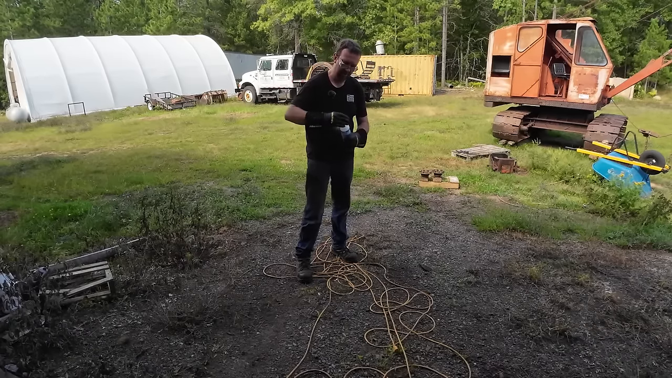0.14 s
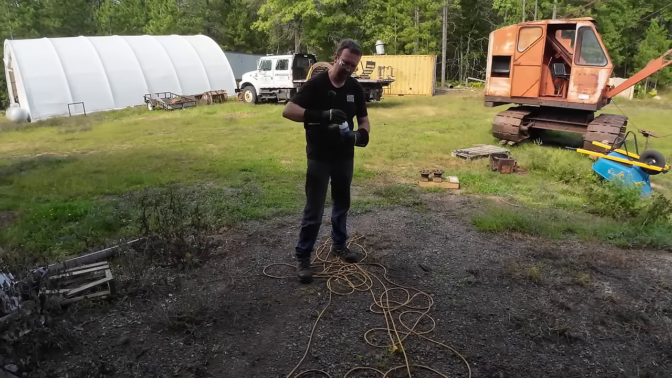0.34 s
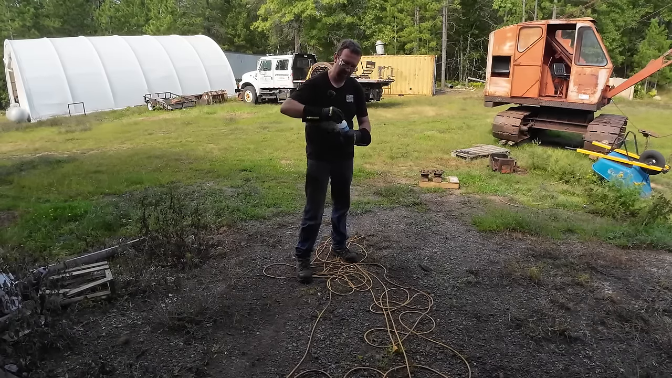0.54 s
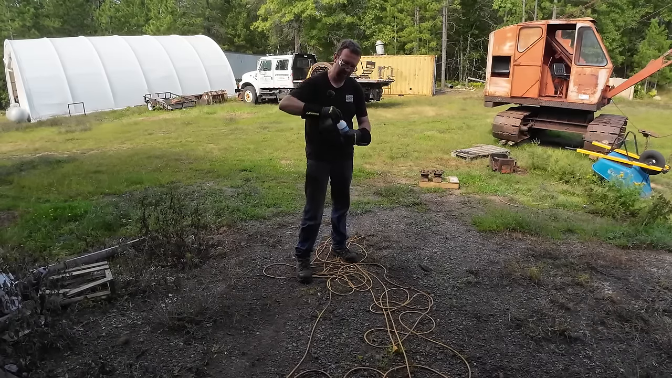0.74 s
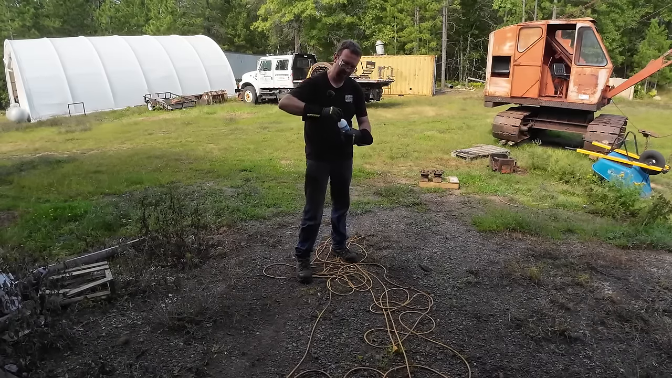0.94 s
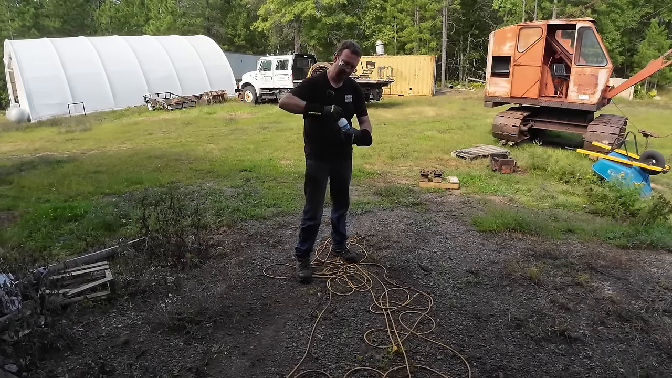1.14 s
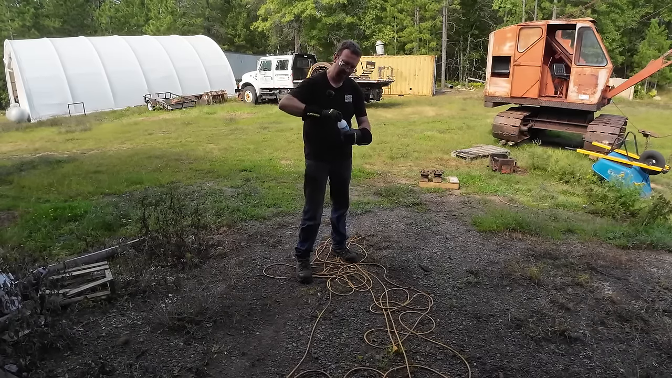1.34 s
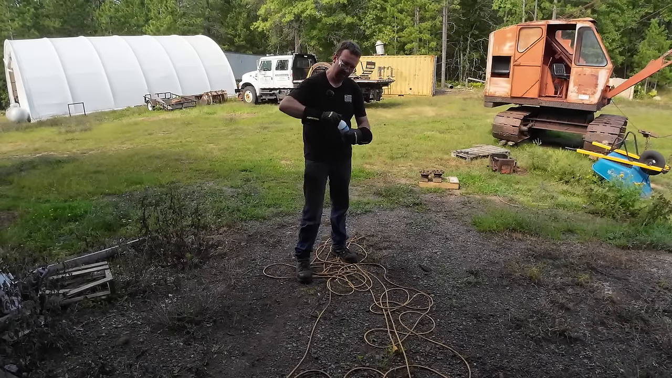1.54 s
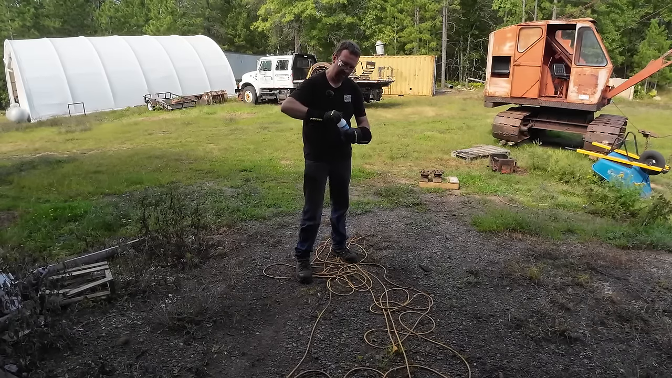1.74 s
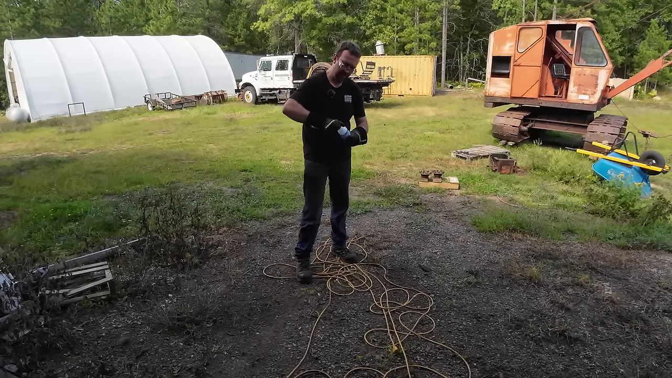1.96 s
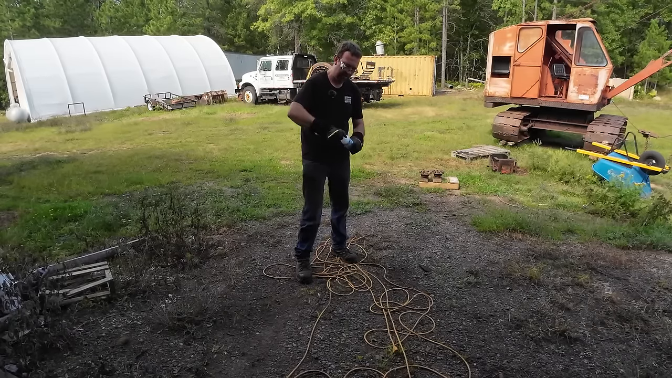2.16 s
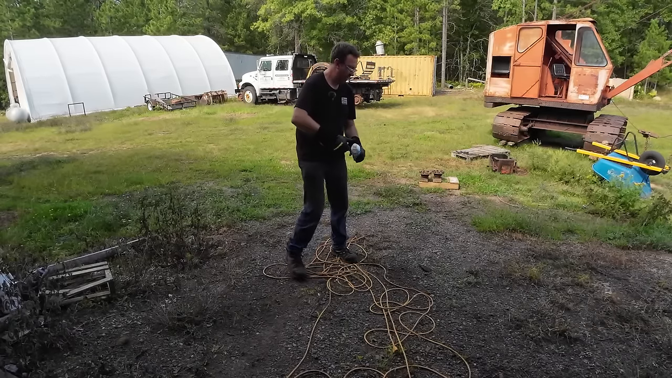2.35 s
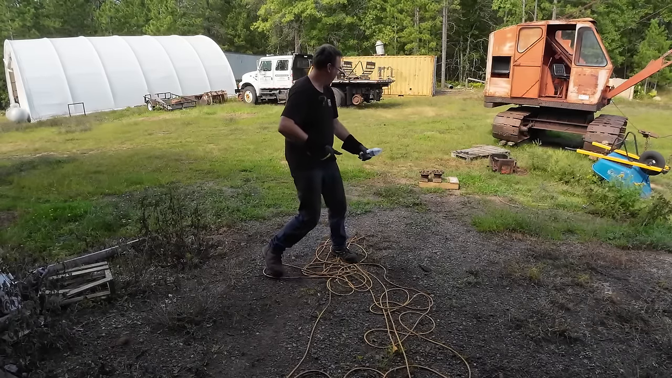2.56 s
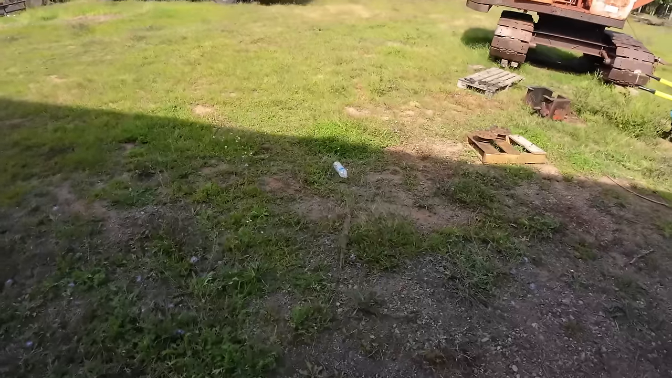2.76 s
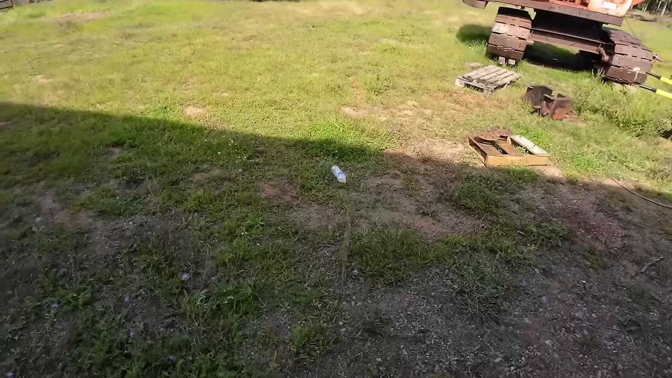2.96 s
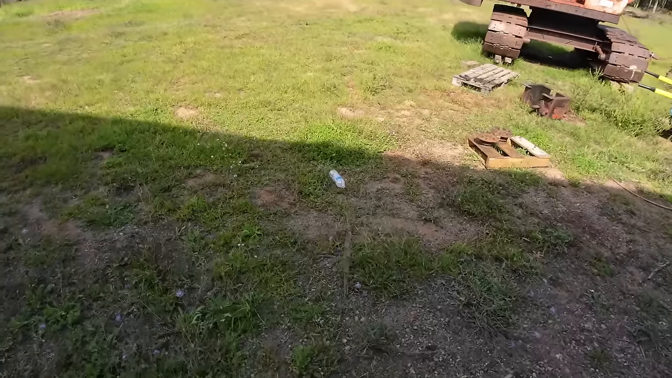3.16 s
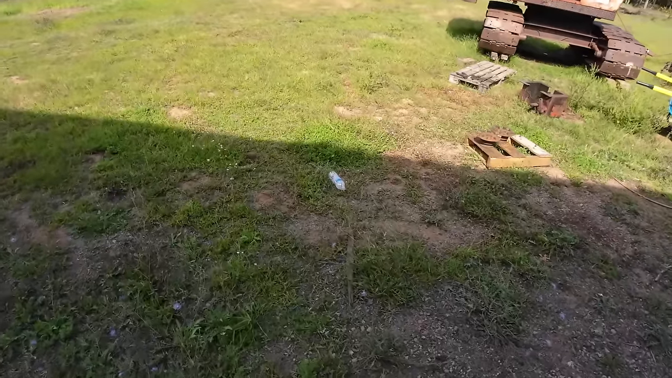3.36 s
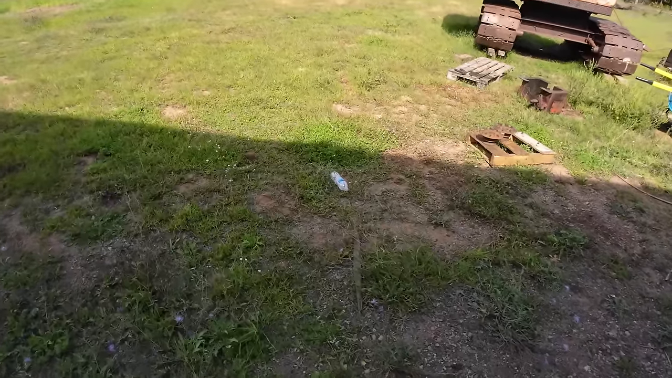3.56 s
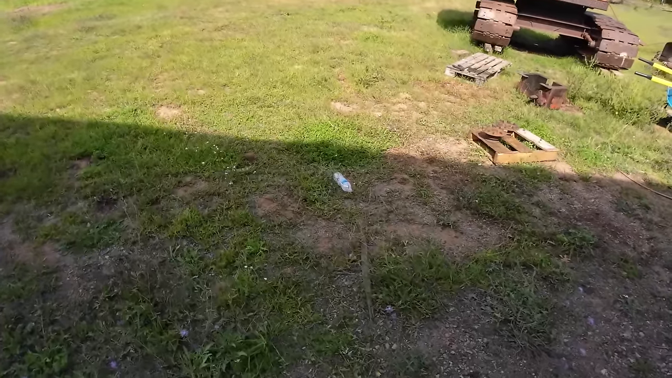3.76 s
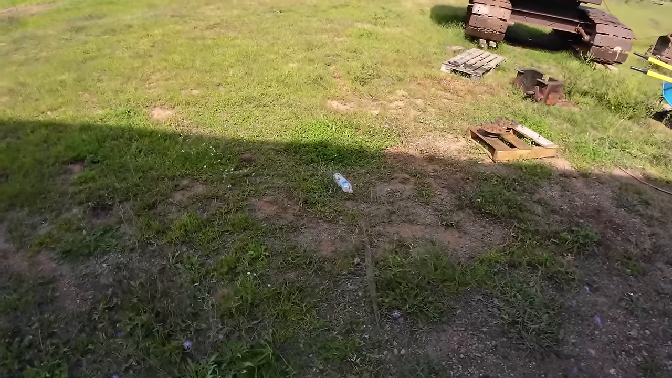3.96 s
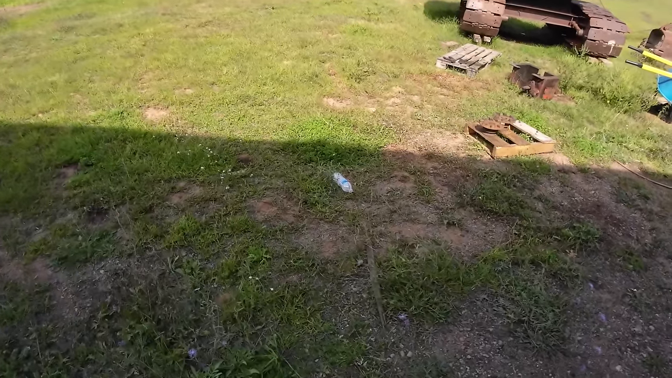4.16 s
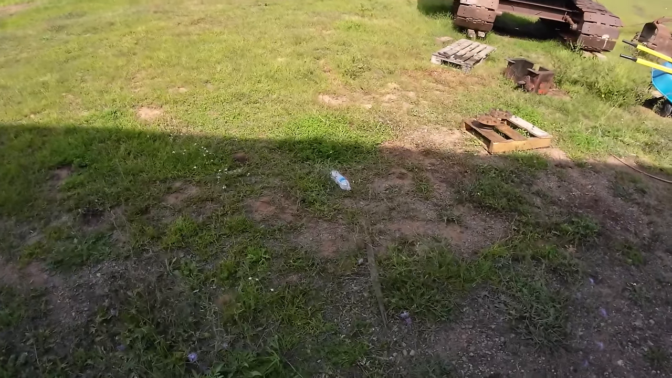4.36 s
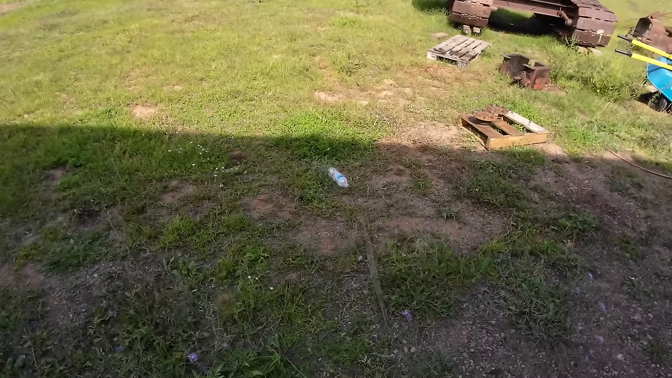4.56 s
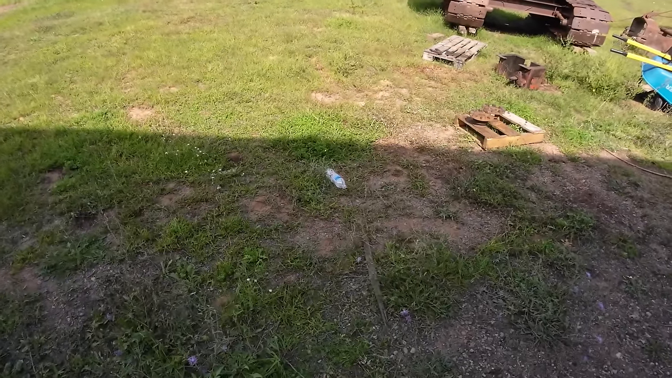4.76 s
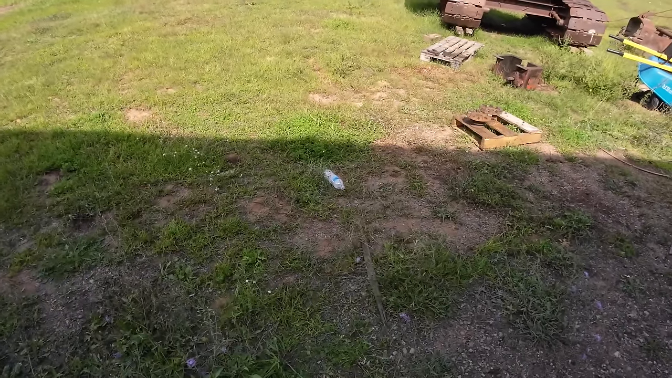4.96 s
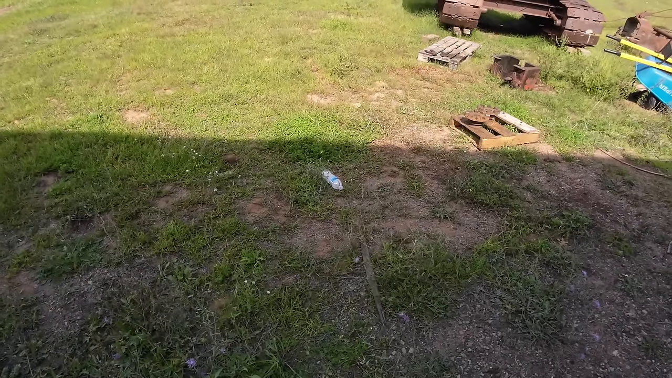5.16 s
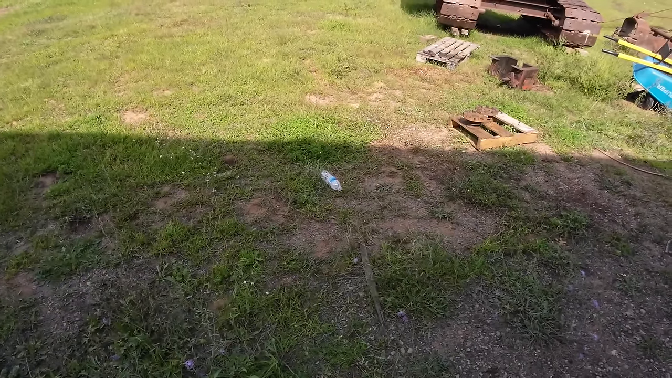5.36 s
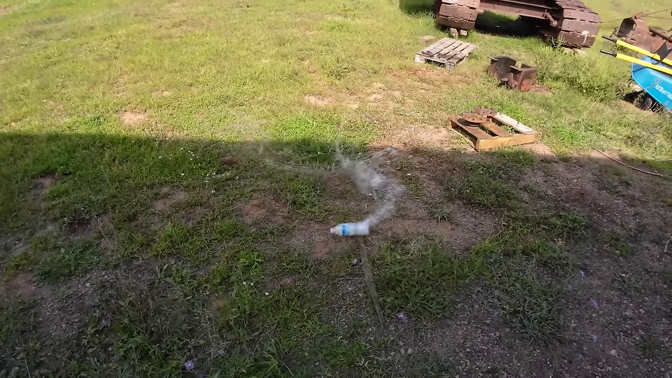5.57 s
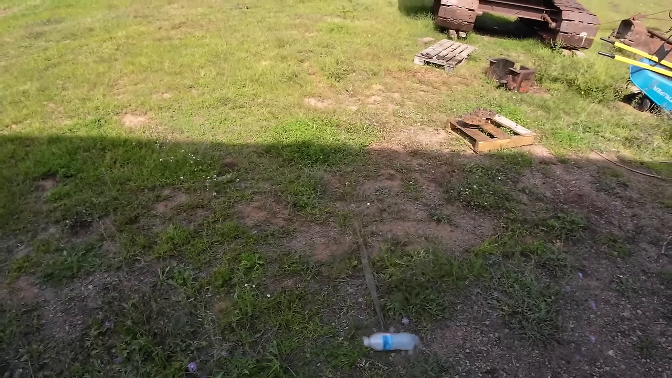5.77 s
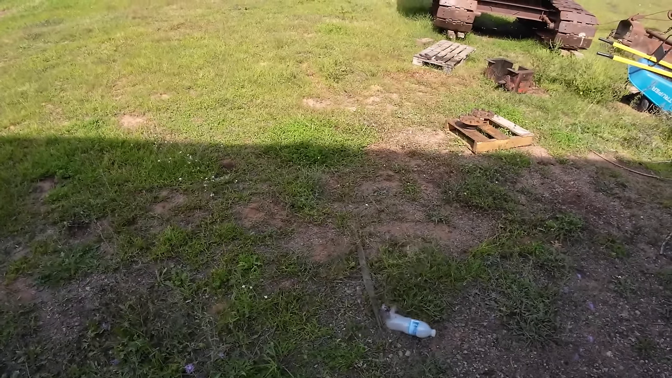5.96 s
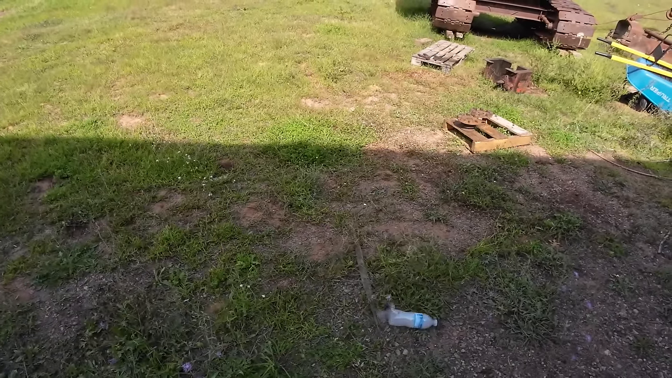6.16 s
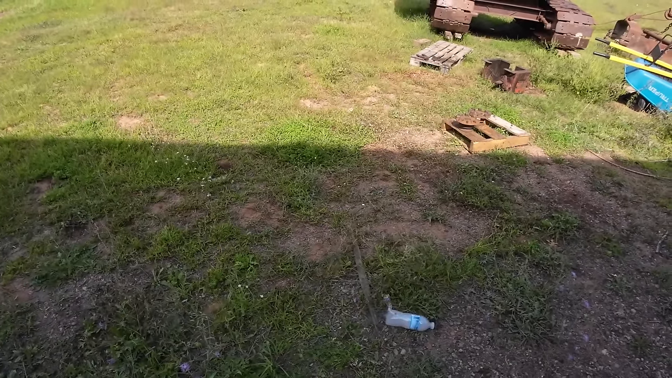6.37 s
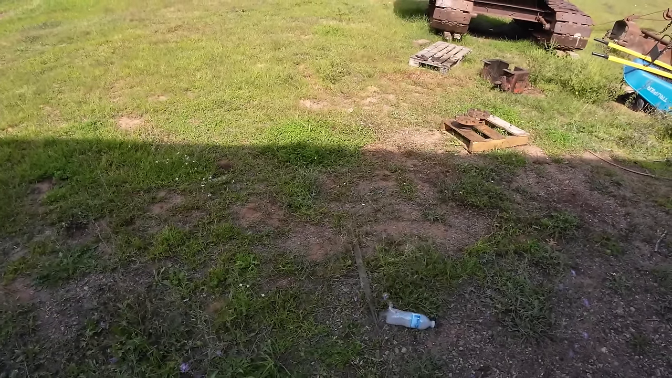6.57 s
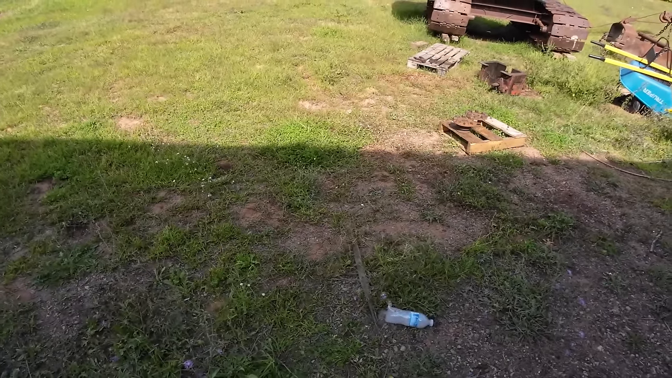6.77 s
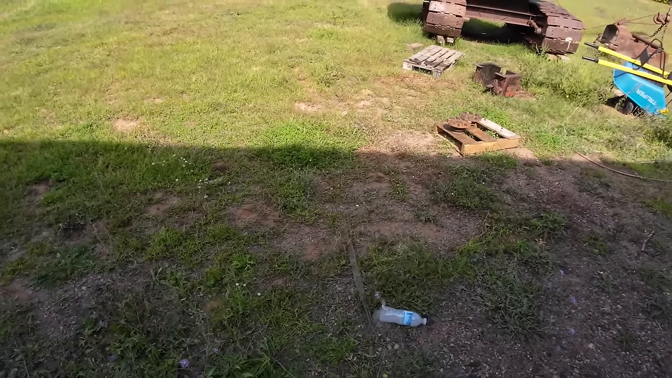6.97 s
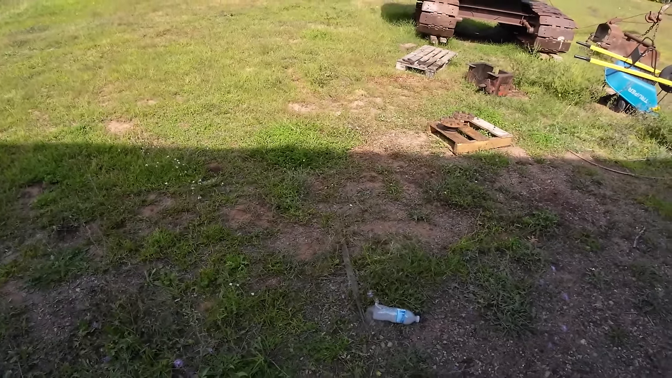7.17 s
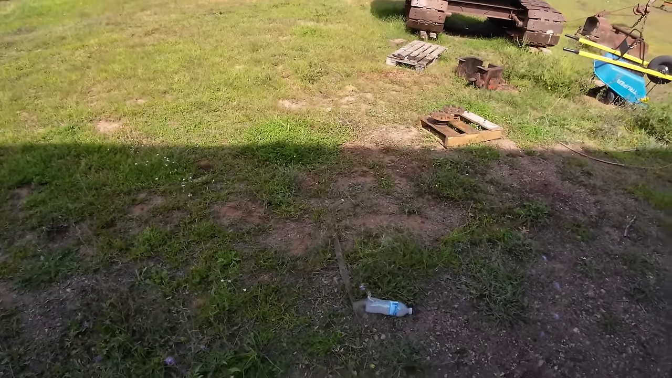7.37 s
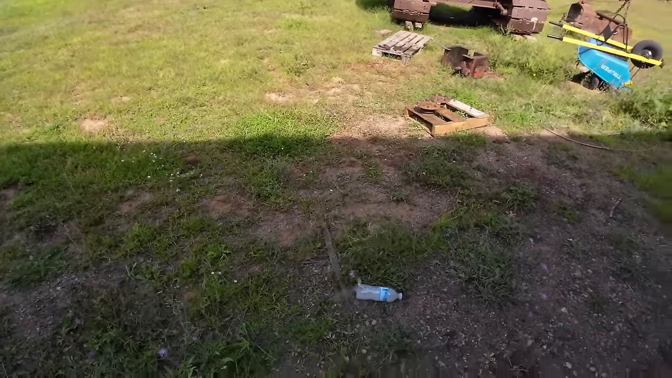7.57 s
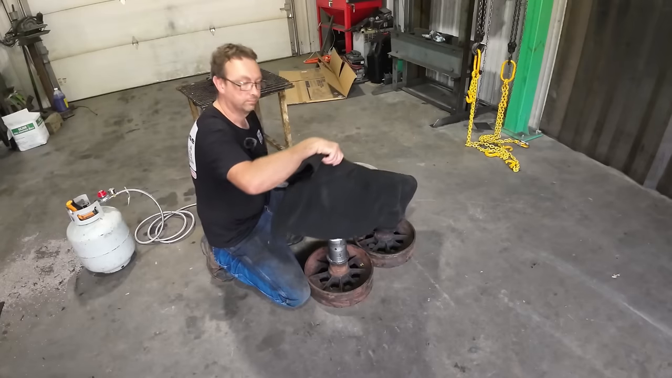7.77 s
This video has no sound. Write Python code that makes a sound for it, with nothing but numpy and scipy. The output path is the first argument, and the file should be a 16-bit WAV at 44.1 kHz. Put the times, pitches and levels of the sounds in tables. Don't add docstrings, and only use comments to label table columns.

```python
import sys
import numpy as np
from scipy import signal
from scipy.io import wavfile
from scipy.ndimage import uniform_filter1d

SR = 44100
rng = np.random.default_rng(int(sys.argv[2]) if len(sys.argv) > 2 else 0)


def boost_factor(decibels):
    exponent = np.asarray(decibels, float) / 20
    return 10 ** exponent


def store_wav(level_fs):
    pcm = np.round(np.clip(np.atleast_2d(level_fs), -1, 1) * 32767)
    wavfile.write(sys.argv[1], SR, pcm.T.astype(np.int16))


N = 344446
T = np.arange(N) / SR
INDOOR_S = 7.63


def band(x, hz, width, order=1):
    edges = np.clip([hz * hz / (hz + width / 2), hz + width / 2], 10, .48 * SR)
    return signal.sosfilt(signal.butter(order, edges, "bandpass", fs=SR, output="sos"), x)


def unit(x):
    return x / np.sqrt(np.mean(x ** 2))


def walk(rate):
    k = int(SR / rate)
    steps = np.repeat(rng.standard_normal(N // k + 1), k)
    return 1.194 * uniform_filter1d(uniform_filter1d(steps, k), k)[:N]


def coloured(points, flicker_db, grain_db):
    hz, db = np.transpose(points)
    out = 0
    for f in hz[0] * 2 ** np.arange(.25, np.log2(hz[-1] / hz[0]), .5):
        grains = rng.standard_normal(N) * boost_factor(grain_db * rng.exponential(size=N))
        weight_db = np.interp(np.log(f), np.log(hz), db) + 10 * np.log10(f)
        out = out + boost_factor(weight_db + flicker_db * walk(12)) * unit(band(grains, f, f / 3, order=2))
    return unit(out)


def bump(s, spread):
    return np.exp(-((T - s) / spread) ** 2)


def add(out, s, x):
    i = int(s * SR)
    out[i:i + len(x)] += x[:len(out) - i]


# start_s, level_db
GUST = [(0, -61.5), (.2, -67), (1.1, -67.5), (2.09, -67), (2.55, -66), (2.65, -58.5), (3.2, -62),
        (3.46, -58), (3.75, -63), (4.4, -58.5), (5.0, -62), (5.5, -63), (6.25, -64), (6.5, -56),
        (6.65, -61.5), (7.2, -56), (7.6, -59), (7.81, -57)]


def breeze_db():
    return np.interp(T, *np.transpose(GUST))


# pitch_hz, level_db (per Hz)
WIND = [(12, -30), (20, -5), (75, 3.5), (130, -2.5), (221, -9), (253, -5.5), (300, -10), (390, -40.5),
        (660, -120)]


def wind():
    return boost_factor(breeze_db()) * coloured(WIND, 2.0, 0.1)


def stirred(calm_level_db, share):
    calm_breeze_db = -63
    return boost_factor(calm_level_db + share * (breeze_db() - calm_breeze_db))


# peak_s, level_db, spread_s
BRUSH = [
    (.97, -60.5, 0.046),
    (1.15, -60, .12),
    (1.5, -53.5, 0.17),
    (2.35, -62, 0.185),
    (3.3, -63.5, 0.12),
    (4.45, -62.5, 0.32),
    (7.4, -63.5, 0.27),
]


def brush_power():
    return sum(boost_factor(db) ** 2 * bump(s, spread) for s, db, spread in BRUSH)


def duck():
    until_s, release_s = 6.47, 0.16
    return boost_factor(-5 * (T > BURST[0][0]) * np.exp(-np.maximum(T - until_s, 0) / release_s))


# pitch_hz, level_db (per Hz)
CLOTH = [(110, -34), (180, -6.5), (259, 1), (456, 4), (642, -2), (784, 1.5), (1630, -7.5), (3000, -20),
         (3900, -49.5), (6600, -120)]


def grass_and_cloth():
    level = np.sqrt(stirred(-63, .4) ** 2 + brush_power())
    return duck() * level * coloured(CLOTH, 1.6, 3.0)


# peak_s, level_db, rise_s, fall_s
GAS = [
    (1.2, -64.5, .25, 0.088),
    (1.508, -54, 0.052, 0.098),
    (2.07, -59, .02, 0.1),
    (2.24, -53, 0.086, .08),
    (2.36, -57, .05, .05),
]


def pressure():
    gas_end_s = 2.6
    flow = sum(boost_factor(db) * np.exp(-np.abs(T - s) / np.where(T < s, rise, fall)) for s, db, rise, fall in GAS)
    return flow * (T < gas_end_s)


# pitch_hz, level_db (per Hz)
LEAVES = [(1290, -35.5), (2200, -4), (3110, -3.5), (4660, -8), (7530, -10), (9700, -15.5), (12500, -14.5),
          (15600, -21), (16500, -34)]


def leaves():
    brushing = boost_factor(-4.5) ** 2 * brush_power()
    spray = (boost_factor(-6) * pressure()) ** 2
    level = np.sqrt(stirred(-66, 0.37) ** 2 + brushing + spray)
    indoors = boost_factor(-5 * (T > INDOOR_S))
    return duck() * level * indoors * coloured(LEAVES, .8, 1.6)


def strike(t, rise, fall, carrier, ring=0.):
    x = carrier * np.where(t < 0, np.exp(-(t / rise) ** 2), np.exp(-t / fall) + ring * np.exp(-t / .005))
    return x / np.abs(x).max()


# thud_db, crack_db, crack_share (of the brittleness, no unit)
KINDS = [
    (-2.5, -5.5, 0.66),
    (-12.5, 13, 1),
    (1, -3.5, 0.97),
]
SNAP, CLICK, KNOCK = 0, 1, 2


def hit(out, s, hz, db, brittle_db, kind, extra_thud_db=0):
    thud_db, crack_db, share = KINDS[kind]
    thud_db += db + extra_thud_db - 8.5 * np.log2(hz / 510)
    crack_db += db + share * brittle_db
    t = (np.arange(1024) - 256) / SR
    a, b, c = rng.standard_normal((3, 1024))
    thud = strike(t, 0.00066, 0.00094, np.sin(2 * np.pi * 330 * t))
    swing = -np.cos(2 * np.pi * hz * t) + 0.66 * unit(band(a, 1100, 1800, order=2))
    body = strike(t, .8 / hz, .0009, swing, ring=0.1)
    snap = np.cos(2 * np.pi * 3600 * t) + 1.1 * unit(band(b, 3300, 2800, order=2))
    crack = strike(t, 0.0005, 0.00092, snap, ring=.04)
    shards = band(c, 7500, 4400, order=2) + 0.36 * band(c, 15000, 5000, order=2)
    splinter = strike(t, 0.00014, 0.001, shards)
    mix = boost_factor(thud_db - 2.0) * thud + boost_factor(db) * body + boost_factor(crack_db) * crack
    add(out, s + t[0], mix + boost_factor(db + brittle_db) * splinter)


# peak_s, pitch_hz, level_db, brittleness_db
KNOCKS = [(0.1127, 510, -47.5, 1), (0.2085, 525, -36, -2.5), (0.2988, 860, -43, -11),
          (0.3142, 510, -42.5, -22), (0.4168, 600, -47.5, -12), (0.4838, 505, -33, -13),
          (0.721, 644, -46.5, -15), (0.7304, 510, -54, -9), (0.959, 1060, -43.5, -10),
          (1.0945, 936, -46, -13), (2.4388, 513, -41, -6), (2.7742, 1560, -37.5, -12),
          (2.8771, 1800, -42.5, -11), (2.9204, 2070, -38, -4.5), (2.9695, 1485, -40.5, -19),
          (3.6031, 620, -43.5, 1), (4.0025, 753, -46.5, -13.5), (4.2068, 1184, -35, -22),
          (6.0457, 511, -49, -9), (6.9615, 1710, -44, -4.5), (6.975, 610, -44.5, -15.5),
          (7.037, 1255, -39, -15), (7.086, 1860, -37.5, -23), (7.096, 788, -43.5, -10),
          (7.624, 983, -53, 5.5)]


def knocks():
    out = np.zeros(N)
    for s, hz, db, brittle_db in KNOCKS:
        hit(out, s, hz, db, brittle_db, KNOCK)
    return out


def with_yard(hits, ground_s=0.0076, ground_db=-27, yard_db=-48, yard_t60=0.22):
    out = hits.copy()
    k = int(ground_s * SR)
    out[k:] += boost_factor(ground_db) * band(out, 4000, 9000)[:-k]
    t = np.arange(SR // 2) / SR
    fade = np.exp(-np.log(1000) * t / yard_t60) * np.minimum(t / 0.05, 1)
    yard = rng.standard_normal(len(t)) * fade * boost_factor(6.7 * walk(80)[:len(t)])
    heard = np.prod([(T < s) | (T > s + .15) for s in (2.612, 7.63)], axis=0)
    return out + boost_factor(yard_db) * heard * signal.fftconvolve(out, yard)[:N]


# pitch_hz, width_hz, level_db
CAP = [(5300, 560, -2.5), (7560, 1100, 1.5), (9000, 570, 0.5), (10980, 1100, -7.5)]
NARROW_S = (1.3, 1.36, 2.08, 2.18)


def gas():
    jet = rng.standard_normal((2, N))
    hiss = unit(sum(boost_factor(db) * band(jet[0], hz, width, order=2) for hz, width, db in CAP))
    spray = unit(band(jet[0], 7000, 4500))
    narrow = np.interp(T, NARROW_S, (1, 0, 0, 1))
    thin = unit(band(jet[1], 14000, 3500, order=2))
    flutter = boost_factor(2.0 * walk(24))
    return flutter * pressure() * (narrow * hiss + (1 - narrow) * spray + boost_factor(-18) * thin)


# peak_s, pitch_hz, level_db, brittleness_db
SNAPS = [(1.0461, 695, -14, -19), (1.3332, 1240, -11, 3.5), (1.3524, 1500, -42, 11), (1.361, 940, -5, 5.5),
         (1.3885, 1800, -3, -6.5), (1.4093, 800, -4.5, 1.5), (1.457, 1879, -6.5, 7.5),
         (1.4771, 2096, -30.5, -3), (1.4825, 1997, -26.5, 18), (1.5645, 1700, -10.5, -5),
         (1.9998, 1390, -5, 3.5), (2.0137, 1670, -52, 20), (2.0192, 1810, -31.5, 13.5),
         (2.0413, 1640, -38, -1)]


def snaps():
    out = np.zeros(N)
    for s, hz, db, brittle_db in SNAPS:
        hit(out, s, hz, db, brittle_db, SNAP, extra_thud_db=0 if 1.35 < s < 1.42 else -16)
    return out


# peak_s, level_db
CREAKS = [
    (1.352, -43),
    (1.379, -41.5),
    (1.428, -36),
    (1.474, -39),
    (1.503, -45),
    (1.522, -46.5),
]
# peak_s, level_db, spread_s, pitch_hz
SPURTS = [(1.6, -55.5, 0.097, 2950), (1.858, -45, 0.0023, 4000), (2.04, -53, 0.032, 6570),
          (2.57, -56, 0.013, 3480), (2.609, -55, .0015, 6000), (2.795, -67, 0.021, 14000),
          (3.06, -69, 0.029, 13950), (3.4, -69.5, 0.18, 7800), (3.5, -61.5, 0.089, 14400),
          (3.605, -56.5, 0.04, 12840), (4.15, -61.5, .043, 6060), (5.578, -25.5, 0.0027, 3987),
          (5.5826, -18.5, 0.0018, 7000), (5.593, -26.5, .005, 4500), (5.624, -32, 0.0091, 7800)]


def spurts():
    out, jet = np.zeros(N), rng.standard_normal(N)
    rows = [(s, db, 0.0044, 7800, 7500) for s, db in CREAKS]
    rows += [(s, db, spread, hz, 6200) for s, db, spread, hz in SPURTS]
    for s, db, spread, hz, width in rows:
        out += boost_factor(db) * bump(s, spread) * unit(band(jet, hz, width, order=2))
    return out * boost_factor(2.0 * walk(300))


# start_s, length_s, first_pitch_hz, last_pitch_hz, level_db
BIRD = [
    (1.665, 0.4, 3498, 3150, -65),
    (4.85, 0.34, 3450, 2950, -72),
    (7.26, .33, 3470, 2930, -69),
]


def bird():
    out, waver = np.zeros(N), walk(40)
    for s, length, first_hz, last_hz, db in BIRD:
        u = np.clip((T - s) / length, 0, 1)
        hz = (first_hz + (last_hz - first_hz) * u) * (1 + 0.016 * waver + 0.012 * walk(150))
        whistle = np.sin(2 * np.pi * np.cumsum(hz) / SR)
        out += boost_factor(db - 2 + 3.0 * walk(60)) * np.sin(np.pi * u) ** .4 * whistle
    echoes = [(.7, 0.049), (0.65, 0.023), (.4, 0.083)]  # gain, delay in s
    return out + sum(gain * np.roll(out, int(delay * SR)) for gain, delay in echoes)


# peak_s, pitch_hz, level_db, brittleness_db
CLICKS = [(1.7606, 1570, -40, -11), (1.8053, 1060, -36, -28), (1.8449, 1730, -24.5, -13),
          (1.8808, 2300, -23.5, -22), (1.9197, 1403, -31, -11), (1.9608, 1637, -41, -20),
          (1.9889, 1500, -37, -15), (2.062, 2000, -31.5, -11.5), (2.2657, 2400, -49, 0.5),
          (2.4211, 1500, -44, -4.5), (2.5535, 1900, -38, -18), (2.5952, 2050, -19, -3.5),
          (5.9266, 815, -30.5, -21), (5.9943, 683, -39, -12), (7.5739, 1750, -35, -17)]


def clicks():
    out = np.zeros(N)
    for s, hz, db, brittle_db in CLICKS:
        hit(out, s, hz, db, brittle_db, CLICK)
    return out


# peak_s, level_db, spread_s, pitch_hz
SCUFF = [
    (2.425, -51, 0.019, 900),
    (2.785, -46, 0.013, 700),
    (2.818, -47, 0.019, 650),
    (3.221, -60, 0.016, 1317),
    (3.39, -57.5, 0.067, 890),
    (3.6, -55, 0.035, 600),
    (4.147, -41.5, 0.02, 641),
    (4.161, -35, 0.0061, 113),
    (7.03, -56, 0.0079, 1602),
    (7.6, -58, 0.006, 1440),
]


def scuffs():
    out = np.zeros(N)
    grit = rng.standard_normal(N) * boost_factor(5.0 * np.minimum(rng.exponential(size=N), 5.0))
    for s, db, spread, hz in SCUFF:
        out += boost_factor(db) * bump(s, spread) * unit(band(grit, hz, 2.18 * hz, order=2))
    return out


# peak_s, level_db
THUMPS = [
    (2.628, -50),
    (2.68, -54),
    (2.705, -55.5),
    (2.745, -56),
    (2.775, -48.5),
    (2.83, -55),
]


def thumps():
    low = unit(band(rng.standard_normal(N), 129, 118, order=2))
    return low * sum(boost_factor(db) * bump(s, 0.0098) for s, db in THUMPS)


# start_s, level_db, half_wave_s, swings (count), treble_db
BURST = [
    (5.5585, 14, .0011, 4.0, -17),
    (5.5693, -9, .0013, 2.0, -40),
    (5.5797, -8, .0011, 3.0, -30),
    (5.5861, 1, .0008, 2.5, -38),
    (5.6243, -6, .0008, 1.6, -35),
    (5.6637, -2, .0009, 2.2, -17),
]
# pitch_hz, start_level_db, fade_by_60_db_s, late_level_db
TAIL = [(59.9, -44.5, 0.22, -56.5), (119, -35.5, .47, -50), (190, -16, .58, -53), (600, -16.5, 0.72, -33.5),
        (800, -19, .64, -45), (1190, -32, 0.63, -54), (8000, -34, 0.73, -58.5), (12700, -40, 0.37, -69.5)]


def burst():
    out, t = np.zeros(N), np.arange(1024) / SR
    for k, (s, db, half, swings, treble_db) in enumerate(BURST):
        tear = rng.standard_normal(1024)
        shock = np.sin(np.pi * t / half) * np.exp(-t / (swings * half)) * (t < 3 * half)
        late = t / (.0007 if k == 0 else .0003)
        shreds = band(tear, 8000, 2000) + 1.8 * band(tear, 2800, 820) + 0.28 * tear
        tearing = late ** 3 * np.exp(-late) * shreds
        add(out, s, boost_factor(db) * (shock + boost_factor(treble_db + 1.0) * tearing))
    out = signal.sosfilt(signal.butter(1, 100, "highpass", fs=SR, output="sos"), out)
    age = np.maximum(T - BURST[0][0], 0)
    swell = np.minimum(age / 0.009, 1) * boost_factor(1.0 * walk(90))
    tail = np.transpose(TAIL)
    late_t60_s = 2.79
    for hz in np.geomspace(tail[0, 0], tail[0, -1], num=14):
        db, t60, late_db = (np.interp(np.log(hz), np.log(tail[0]), col) for col in tail[1:])
        fade = boost_factor(db - 60 * age / t60) + boost_factor(late_db - 60 * age / late_t60_s)
        noise = unit(band(rng.standard_normal(N), hz, hz / 2.2, order=2))
        out += swell * fade * boost_factor(1.5 * walk(40)) * noise
    return out


def shed_hiss():
    return boost_factor(-74.5) * (T > INDOOR_S) * unit(band(rng.standard_normal(N), 12500, 4500, order=2))


def scene():
    surroundings = wind() + grass_and_cloth() + leaves() + scuffs() + thumps() + shed_hiss()
    hits = with_yard(knocks() + snaps() + clicks())
    return (surroundings + hits + gas() + spurts() + bird() + burst())[None]


def low_pass(x):
    return signal.sosfilt(signal.butter(12, 16710, fs=SR, output="sos"), x)


def record(dry):
    x = signal.sosfilt(signal.butter(1, 35, "highpass", fs=SR, output="sos"), dry)
    x = np.clip(x, -.97, .97)
    x = signal.sosfilt(signal.butter(6, 15600, fs=SR, output="sos"), x)
    return low_pass(np.clip(x, -1, 1))


dry = scene()
out = record(dry)
store_wav(out)
```